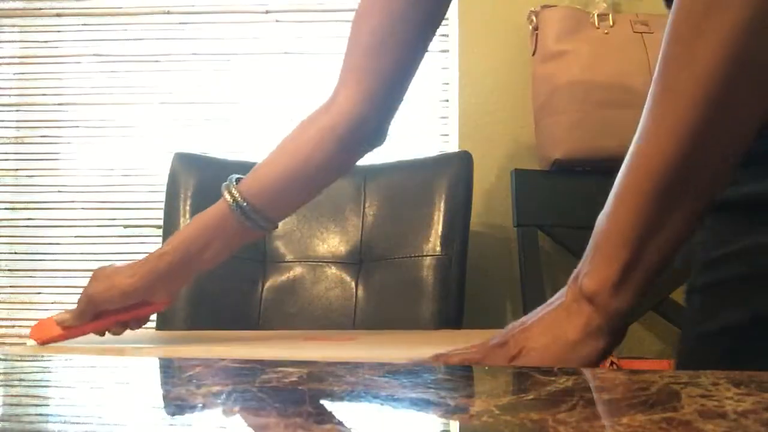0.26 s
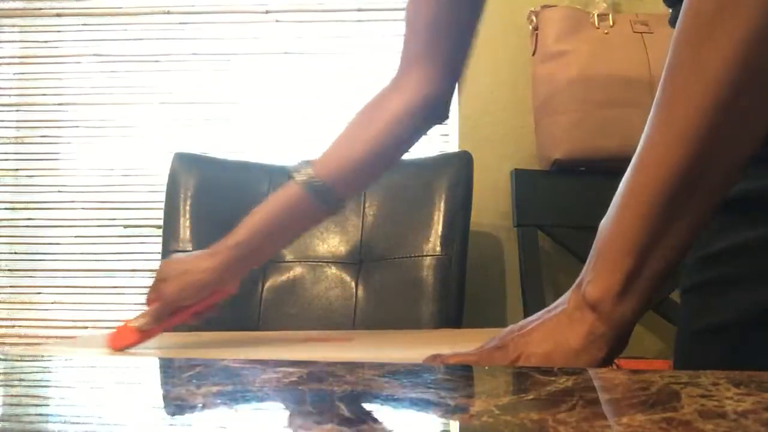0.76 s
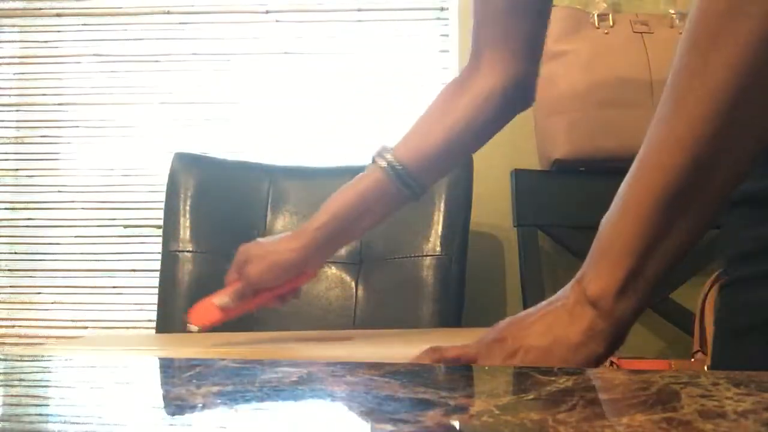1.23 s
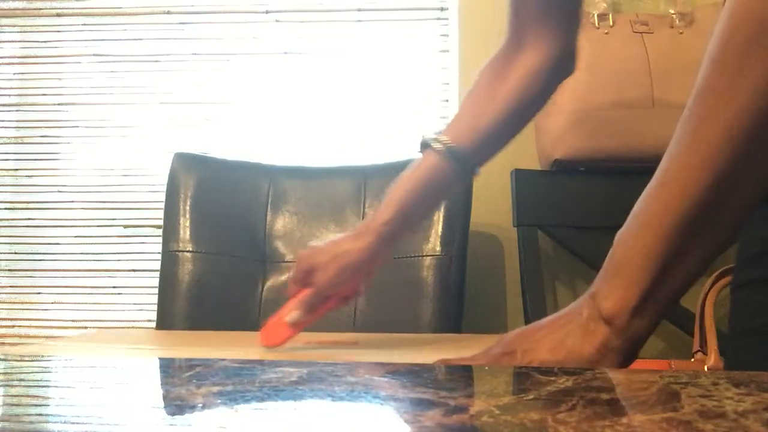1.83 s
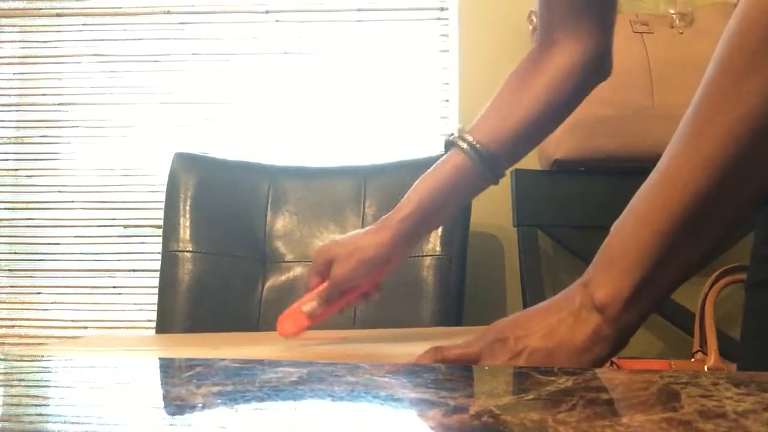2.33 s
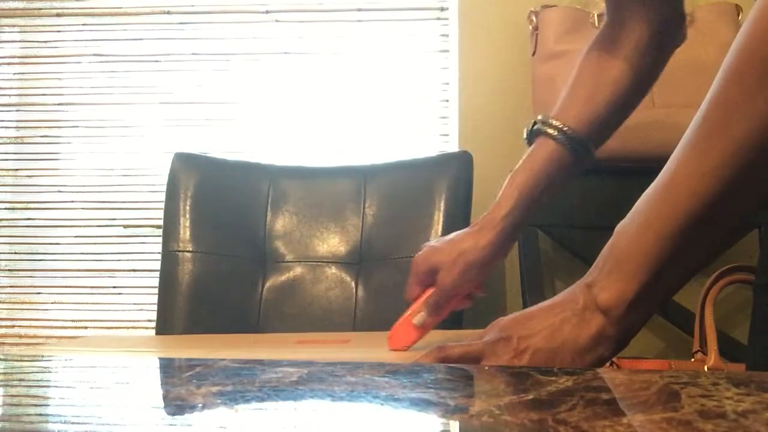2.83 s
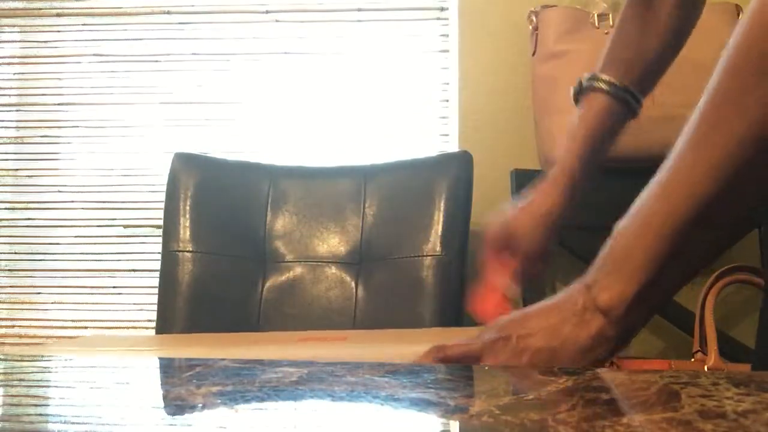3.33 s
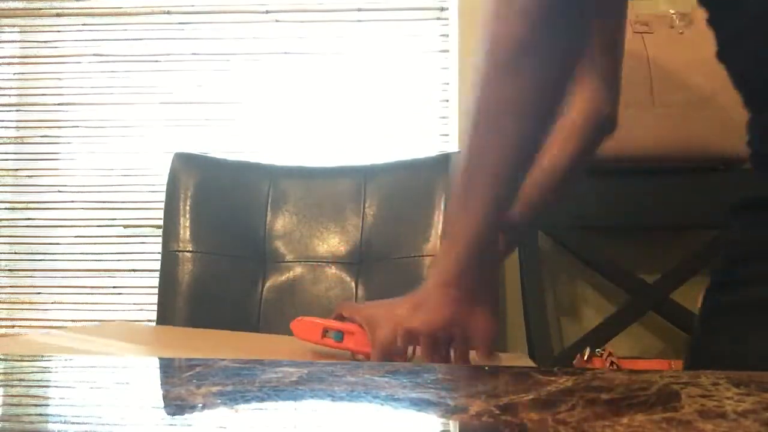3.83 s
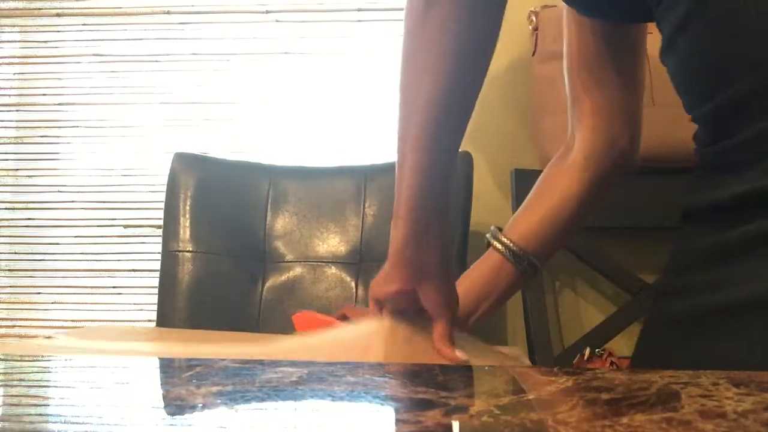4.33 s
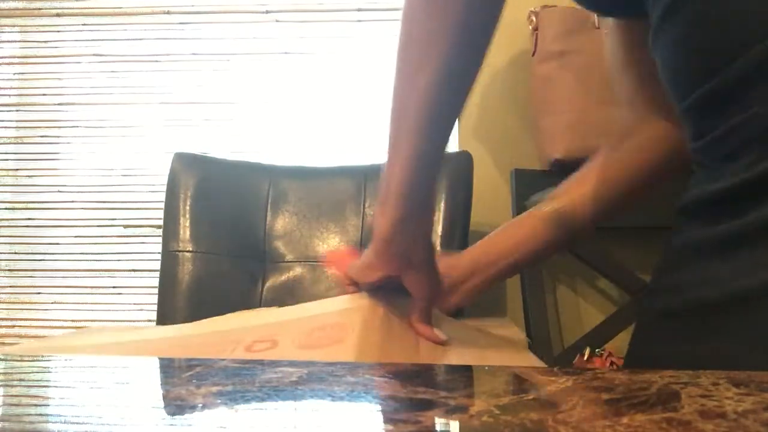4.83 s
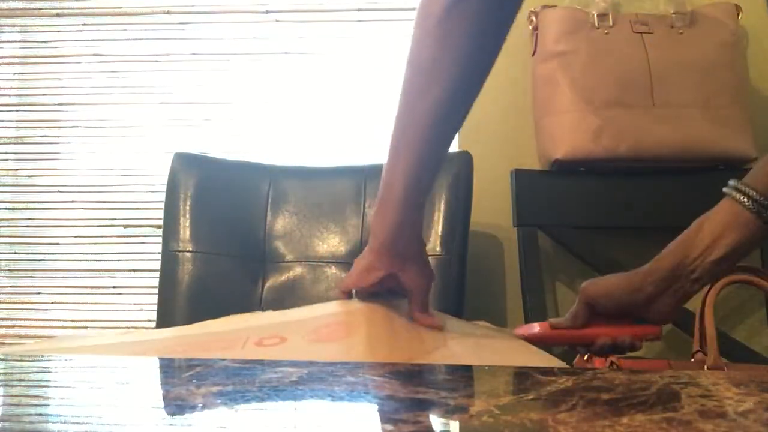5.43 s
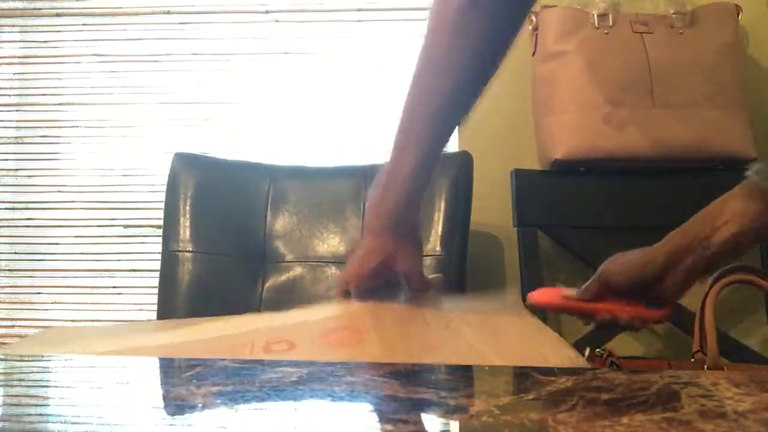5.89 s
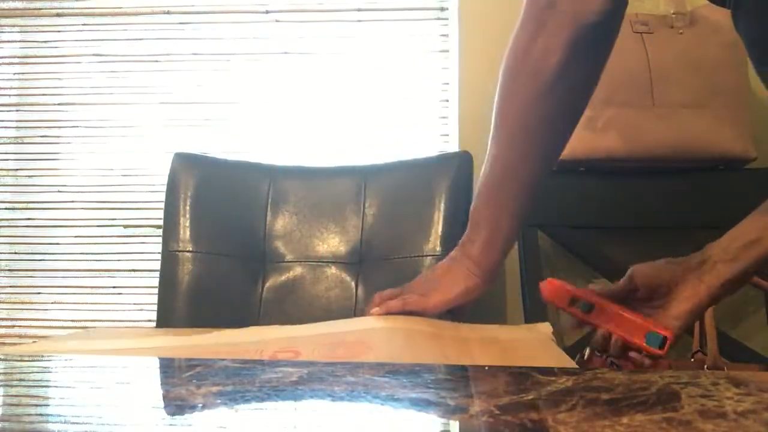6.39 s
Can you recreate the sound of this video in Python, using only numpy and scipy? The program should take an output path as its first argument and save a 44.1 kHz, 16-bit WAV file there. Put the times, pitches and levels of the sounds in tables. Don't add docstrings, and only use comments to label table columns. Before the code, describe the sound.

A close phone microphone, about arm's length away, in a small furnished room with faint air and low appliance hum. Light scuffs of blade and fingers come first. From 0.4 to 1.25 seconds a cutter drags through corrugated cardboard with a gritty, jerky rasp. Shorter pulls start at 1.45 with a sharp catch, 1.8 and 2.23; a hard catch at 2.48 begins another drag, and a last long scrape runs from 2.9 to 3.45, shaking the counter softly. At 3.49 the plastic slider clacks brightly. Palms brush the sheet at 3.7. Folding builds from 4.0, with snaps at 4.15 and 4.28, the loudest crack at 4.38, and more cracks and a low thud at 4.53 and 4.63. Rustling fades by 5; small ticks come near 5.3, a soft flopping thud at 5.6, a tick at 6.0, then rubbing and light slider rattles from 6.3 to 6.6.

```python
import sys
import numpy as np
from scipy import signal
from scipy.fft import rfft, irfft, next_fast_len
from scipy.io import wavfile
from scipy.ndimage import uniform_filter1d, map_coordinates

SR = 44100
rng = np.random.default_rng(int(sys.argv[2]) if len(sys.argv) > 2 else 0)


def level_to_linear(level):
    exponent = np.asarray(level, float) / 20
    return 10 ** exponent


def waveform_to_disk(signal):
    frames = np.transpose(np.atleast_2d(signal))
    scaled = np.clip(frames, -1, 1) * 32767
    samples = np.round(scaled).astype(np.int16)
    wavfile.write(sys.argv[1], SR, samples)


N = 293425


def unit(x):
    return x / np.sqrt(np.mean(x ** 2) + 1e-20)


def along(points, hz):
    f, v = np.transpose(points)
    return np.interp(np.log(hz + 1), np.log(f + 1), v)


def wobble(rate_hz):
    knots = rng.standard_normal(int(N * rate_hz / SR) + 4)
    return map_coordinates(knots, [np.arange(N) * rate_hz / SR])


def filtered(x, response):
    m = next_fast_len(len(x) + SR // 2)
    return irfft(rfft(x, m) * response(np.fft.rfftfreq(m, 1 / SR)), m)[:len(x)]


def resonances(modes):
    def response(f):
        total = 0
        for k, (hz, width, db) in enumerate(modes):
            total = total + (-1) ** k * level_to_linear(db) * 1j * f * width / (hz * hz - f * f + 1j * f * width)
        return total
    return response


def burst(noise, t60, rise, colour, spike=0):
    t = np.arange(len(noise)) / SR
    force = noise * level_to_linear(-60 * t / max(t60, .002)) * (1 - np.exp(-t / rise))
    first_break = spike * (np.arange(len(noise)) == 8)
    y = filtered(force + first_break, colour)
    return y / np.abs(y).max()


# (frequency [Hz], level [dB per Hz])
AIR_SPECTRUM = [(15, -16), (25, -15), (86, 2.5), (306, -4.5), (423, -24), (724, -15), (1080, -19),
                (1310, -16), (1670, -25), (2020, -23.5), (6770, -26.5), (14400, -31.5), (15600, -31)]


def air():
    tone = unit(filtered(rng.standard_normal(N), lambda f: level_to_linear(along(AIR_SPECTRUM, f))))
    hum = level_to_linear(-75.0 + 2.5 * wobble(3.1)) * np.sin(2 * np.pi * 59.9 * np.arange(N) / SR)
    return level_to_linear(-65 + 0.84 * wobble(3.54)) * tone + hum


# (frequency [Hz], t60 [s])
ROOM_DECAY = [(100, 0.3), (500, 0.27), (2000, 0.33), (6000, 0.4), (14000, 0.22)]


def room(x):
    out, hop = np.zeros(N + 2 * SR), SR // 3
    for at in range(0, N, hop):
        hz, t, z = signal.stft(rng.standard_normal(SR // 2), SR, nperseg=256)
        decay = level_to_linear(-60 * t / along(ROOM_DECAY, hz)[:, None])
        tail = signal.istft(z * decay, SR, nperseg=256)[1]
        wet = signal.fftconvolve(x[at:at + hop], tail / np.linalg.norm(tail))
        out[at + 300:][:len(wet)] += wet
    return out[:N]


def ringing(strikes, rise, blur):
    out, t = np.zeros(N + SR), np.arange(SR // 4) / SR
    for s, hz, db, t60 in strikes:
        steps = rng.standard_normal(len(t) // 50)
        drift = np.interp(t, t[:len(steps)] * 50, np.cumsum(steps))
        wander = blur * np.sqrt(hz / 1000) * drift
        swell = level_to_linear(db - 60 * t / max(t60, .005)) * (1 - np.exp(-t / rise))
        out[round(s * SR):][:len(t)] += swell * np.sin(2 * np.pi * hz * t + wander)
    return out[:N]


# (time [s], frequency [Hz], peak level [dB], t60 [s])
BOARD_PATCHES = [(2.481, 654, -20, 0.028), (3.902, 230, -40, 0.16), (4.126, 1195, -40, 0.17),
                 (4.151, 722, -23.5, 0.052), (4.152, 1140, -28, .06), (4.17, 110, -29, 0.071),
                 (4.283, 607, -25.5, 0.056), (4.284, 1310, -35, 0.09), (4.288, 371, -28, 0.11),
                 (4.378, 630, -13.5, .07), (4.3775, 2080, -18, 0.025), (4.379, 1300, -26, 0.076),
                 (4.378, 2540, -31, 0.037), (4.381, 240, -27, 0.17), (4.535, 617, -23, 0.04),
                 (4.534, 2090, -25, 0.027), (4.537, 268, -26, 0.048), (4.631, 280, -7.5, 0.031),
                 (4.63, 2550, -29.5, 0.043), (4.642, 350, -28.5, 0.3), (4.645, 994, -35, .14),
                 (5.03, 568, -43.5, 0.054), (5.265, 907, -35, .05), (5.266, 1300, -38.5, 0.061),
                 (5.315, 1340, -41.5, 0.12), (5.35, 810, -40, 0.077), (5.608, 327, -23.5, .1),
                 (5.627, 606, -25, 0.17), (5.635, 110, -28, .15), (5.652, 400, -24, 0.14),
                 (5.693, 239, -23, .08), (6.03, 515, -41.5, 0.045), (6.311, 626, -37.5, 0.18),
                 (6.313, 393, -38.5, 0.13), (6.312, 1600, -44, 0.1), (5.645, 1000, -38, .14),
                 (4.635, 175, -18, .08), (4.63, 900, -24, .04), (5.62, 820, -26, .06),
                 (5.626, 290, -21, .12), (4.184, 2100, -32, .05), (4.152, 2100, -32, .05),
                 (5.607, 2550, -34, .05), (5.62, 1250, -32, .04), (5.246, 3350, -36, .02),
                 (4.036, 500, -32, .04), (3.684, 450, -38, .05), (5.264, 2150, -38, .03)]


def patches():
    return ringing(BOARD_PATCHES, rise=0.001, blur=0.43)


# (time [s], peak level [dB], frequency [Hz])
SHARP_TICKS = [(2.9532, -33, 2500), (3.4858, -20, 1900), (4.3766, -6.5, 2150), (4.3776, -12, 6000),
               (4.3872, -17, 6000), (5.2455, -38, 7000), (5.2752, -27, 5700), (5.314, -27, 6300),
               (5.9885, -24, 1900), (5.9888, -30, 6300)]


def ticks():
    out, impulse = np.zeros(N + SR), np.arange(SR // 50) == 8
    for s, db, hz in SHARP_TICKS:
        edge = resonances([(hz, 0.36 * hz, 0)])
        tick = filtered(-1. * impulse, lambda f: edge(f) ** 2)
        out[round(s * SR):][:len(tick)] += level_to_linear(db) * tick / np.abs(tick).max()
    return out[:N]


# (frequency [Hz], width [Hz], level [dB])
PANEL_MODES = [(597, 180, 2), (830, 350, 1.5), (1030, 156, 3), (1313, 124, 2.5), (1610, 140, -9)]
# (frequency [Hz], width [Hz], level [dB])
SHEET_MODES = [(89.5, 34, -5), (137, 37, 1.5), (225, 34, 4), (298, 48, 2), (350, 41, 2.5), (414, 70, -2.5)]


def snaps(events, hz, rise, spike, broad):
    out = np.zeros(N + SR)
    crack_band = resonances([(hz, .7 * hz, 0)])
    sharp = lambda f: crack_band(f) ** 2 + broad * 1j * f / (2500 + 1j * f) / (1 + 1j * f / hz)
    panel = lambda f: resonances(PANEL_MODES)(f) / (1 + 1j * f / 900)
    sheet = lambda f: resonances(SHEET_MODES)(f) / (1 + 1j * f / 450) ** 2
    for s, crack_db, knock_db, thud_db, t60 in events:
        a, b, c = rng.standard_normal((3, SR // 4))
        hit = level_to_linear(crack_db) * burst(a, t60, rise, sharp, spike)
        hit += level_to_linear(knock_db - 2.0) * burst(b, t60 + 0.019, 3 * rise, panel, 3 + 2.2 * spike)
        hit += level_to_linear(thud_db - 1.5) * burst(c, 1.24 * t60 + 0.021, 4 * rise, sheet, 9 + 4 * spike)
        out[round(s * SR):][:len(hit)] += hit
    return out[:N]


# (time [s], crack [dB], knock [dB], thud [dB], burst t60 [s])
SCUFF_EVENTS = [(.0074, -41.5, -57, -72, 0.025), (.0217, -49.5, -62, -61, 0.094),
                (.0453, -42.5, -64, -70, .05), (.0538, -55, -74, -57, 0.021),
                (.2463, -35.5, -47, -45, 0.025), (.2963, -46, -54, -47, 0.048), (.33, -44, -66, -56, 0.037),
                (.3385, -39.5, -70, -47, 0.014), (2.5622, -36.5, -38, -43, 0.039),
                (4.1225, -39, -28, -40, 0.12), (5.5664, -44, -46, -50, 0.02)]


def scuffs():
    return snaps(SCUFF_EVENTS, 3150, rise=0.0012, spike=0.38, broad=0.099)


# (time [s], crack [dB], knock [dB], thud [dB], burst t60 [s])
BUCKLE_EVENTS = [(3.6851, -42.5, -41.5, -31, 0.091), (3.8977, -43, -34.5, -27.5, 0.028),
                 (4.151, -24.5, -21.5, -30, 0.061), (4.1834, -25, -38, -29, 0.023),
                 (4.597, -30, -41, -37, 0.016), (5.2644, -32.5, -40, -43, 0.023),
                 (5.3484, -45, -33, -33, 0.042), (5.606, -33.5, -37, -22.5, 0.046),
                 (5.6256, -34, -33, -25, 0.073), (6.0295, -45, -40, -33, 0.023),
                 (5.932, -51, -45, -53, 0.033), (6.152, -51, -42, -36.5, 0.11),
                 (6.3065, -51, -36, -50, 0.15)]


def buckles():
    return snaps(BUCKLE_EVENTS, 1640, rise=0.00079, spike=0.21, broad=0.62)


# (time [s], crack [dB], knock [dB], thud [dB], burst t60 [s])
SPLIT_EVENTS = [(4.35, -33, -73, -74, .04), (4.3765, -17, -73.5, -73, 0.011),
                (4.5678, -31, -75, -68, 0.013), (4.5947, -28, -64, -73, .03),
                (4.6292, -13, -70.5, -67.5, 0.009), (5.108, -41, -75, -75, 0.0091)]


def splits():
    return snaps(SPLIT_EVENTS, 10400, rise=0.00065, spike=3.5, broad=0.13)


# (time [s], crack [dB], knock [dB], thud [dB], burst t60 [s])
CREASE_EVENTS = [(1.816, -50, -49, -54, .027), (1.9166, -31, -30, -58, .0067),
                 (2.5003, -30.5, -42, -47, 0.044), (2.9534, -44, -32, -61, .026),
                 (3.717, -42.5, -45, -41, 0.048), (3.9065, -38, -33, -28.5, 0.057),
                 (4.0142, -45.5, -46, -54, 0.068), (4.0357, -35.5, -31, -27, 0.038),
                 (4.0534, -44, -55, -38, 0.019), (4.2812, -18.5, -19, -24, 0.092),
                 (4.377, -8, -13, -22.5, 0.03), (4.3864, -14, -24, -47, 0.02),
                 (4.5331, -15, -19.5, -18.5, 0.026), (4.6289, -13, -20, -14, 0.04),
                 (4.9314, -42, -46.5, -37.5, 0.039), (4.9945, -55, -70.5, -54, 0.019),
                 (5.0295, -46, -52.5, -38, 0.014), (5.108, -49, -53, -44.5, 0.1),
                 (5.3138, -31, -41, -44, 0.038)]


def creases():
    return snaps(CREASE_EVENTS, 2080, rise=0.00026, spike=1.2, broad=1.0)


# (time [s], crack [dB], knock [dB], thud [dB], burst t60 [s])
CATCH_EVENTS = [(.3957, -35.5, -68, -46.5, 0.038), (.4614, -51, -63, -56, 0.023),
                (1.4486, -21, -49, -48, 0.012), (2.2295, -29.5, -68, -58, 0.017),
                (2.3612, -32, -50, -42, 0.065), (2.4799, -23, -34, -49, 0.0099),
                (5.218, -57, -47.5, -46, .029), (5.246, -39, -46, -49, 0.024), (5.2748, -36, -39, -59, .02)]


def catches():
    return snaps(CATCH_EVENTS, 3450, rise=0.00029, spike=2.06, broad=0.42)


# (frequency [Hz], level [dB], t60 [s])
STEEL_MODES = [(2160, 1.5, 0.076), (3150, 0, 0.068), (4820, -1, 0.055), (6430, -0.5, .04), (7450, -3, 0.06),
               (9330, -7, 0.037), (10500, -8, .05), (11700, -16.5, 0.082), (14300, -9.5, .045)]
# (time [s], peak level [dB], favoured frequency [Hz])
BLADE_CHINKS = [(3.4865, -28, 7800), (6.3125, -53, 3150), (6.3635, -41, 4900), (6.3705, -46, 9500),
                (6.385, -51, 5500), (6.4705, -45, 8500), (6.471, -56, 2160), (6.545, -45.5, 2160),
                (6.5565, -45, 9340), (6.573, -51, 3150), (6.5875, -51, 3150)]


def steel():
    strikes = []
    for s, db, near_hz in BLADE_CHINKS:
        for hz, level, t60 in STEEL_MODES:
            loss_db = 22.5 * abs(np.log(hz / near_hz))
            strikes.append((s, hz, db + level - loss_db, t60))
    return ringing(strikes, rise=0.00035, blur=0.25)


# (time [s], peak level [dB], top over peak [dB], burst t60 [s], contact pitch
# [Hz])
SLIDER_CLICKS = [(3.4567, -41.5, -25, 0.028, 1910), (3.474, -42.5, -25, 0.034, 1980),
                 (3.486, -16, 12, 0.023, 2030), (3.8272, -47, -8, 0.012, 7630),
                 (5.9879, -33, -35, 0.005, 1980), (6.313, -69, -25, 0.013, 3230),
                 (6.3645, -42.5, -17, 0.012, 5700), (6.384, -47, -8, .01, 7500),
                 (6.4705, -35.5, 0, 0.012, 7450), (6.5327, -46, -19, 0.012, 2150),
                 (6.5433, -45, -19, 0.016, 2140), (6.573, -47, -16.5, 0.0073, 3250),
                 (6.6065, -47, -24, 0.0089, 4060),
                 (6.3685, -47, 6, 0.011, 9100), (6.5255, -50, -12, 0.014, 2300),
                  (6.5565, -48, -6, .012, 7600), (6.5725, -53, -8.5, .008, 6300),
                  (6.588, -43.5, -8, .01, 3250), (6.611, -50, -15, .008, 3250)]
# (frequency [Hz], width [Hz], level [dB])
HANDLE_MODES = [(2013, 170, -1), (3280, 140, -4.5), (3900, 440, -4), (4930, 480, -8.5), (7600, 160, -5),
                (9100, 410, -19), (12160, 840, 0)]
# (frequency [Hz], level [dB per Hz])
CLACK_SPECTRUM = [(700, -52), (1800, -15), (2060, 2), (2450, -11), (5600, -4), (7400, -4), (9000, -21),
                  (11700, -22), (19800, -120)]


def slider():
    out = np.zeros(N + SR)
    clack = lambda f: level_to_linear(along(CLACK_SPECTRUM, f))
    top = lambda f: (1j * f / (7000 + 1j * f)) ** 3
    for s, db, top_db, t60, pitch_hz in SLIDER_CLICKS:
        a, b, c = rng.standard_normal((3, SR // 4))
        modes = [(hz, width, level - 14 * abs(np.log(hz / pitch_hz))) for hz, width, level in HANDLE_MODES]
        clack_db = -7 * abs(np.log(pitch_hz / HANDLE_MODES[0][0]))
        ring_db = -9 - 0.16 * top_db
        click = level_to_linear(clack_db) * burst(a, t60, 0.00028, clack, spike=1.58)
        click += level_to_linear(top_db) * burst(b, 1.3 * t60, 0.0023, top, spike=5.5)
        click += level_to_linear(ring_db) * burst(c, 2.7 * t60, 0.001, resonances(modes), spike=3.0)
        out[round(s * SR):][:len(click)] += level_to_linear(db + 3) * click
    return out[:N]


# (middle time [s], frequency [Hz], level [dB], length [s])
NARROW_TONES = [(.022, 3000, -64, .04), (.057, 3000, -62, 0.016), (.058, 2360, -58, 0.017),
                (0.272, 2420, -59, .05), (.3, 4600, -58, 0.022), (.34, 3200, -60, 0.043),
                (.48, 4020, -64, .06), (0.573, 5030, -49, 0.076), (.57, 3900, -52, 0.066),
                (.62, 2086, -52, .12), (0.78, 3900, -53, 0.15), (0.811, 2830, -52, .18), (0.8, 1300, -54, 0.2),
                (0.717, 900, -54, 0.053), (1.054, 760, -57, 0.29), (1.57, 2120, -49, 0.11),
                (1.592, 1340, -56.5, 0.13), (1.61, 2850, -54, .1), (1.482, 680, -54, 0.069),
                (1.863, 1030, -50, .1), (2.023, 2730, -52.5, 0.073), (2.04, 1300, -51.5, 0.05),
                (1.96, 88, -40, 0.082), (3.379, 97.4, -47, 0.083), (.3, 335, -64, 0.56), (.35, 60, -61, 0.16),
                (2.68, 2950, -52.5, 0.22), (3.25, 326, -49.5, 0.19), (3.27, 806, -54, 0.17),
                (3.42, 192, -52, 0.095), (3.72, 71.4, -51.5, .12), (3.92, 60, -49.5, .12),
                (4.72, 967, -50, 0.1), (5.34, 2640, -60, 0.032), (5.52, 128, -53, 0.048),
                (5.52, 813, -56, 0.13), (3.545, 2030, -51, .11), (6.03, 2060, -60, .075),
                (6.025, 4100, -59, .06), (6.64, 381, -57, 0.032), (.065, 3220, -57, 0.012)]


def singing():
    out, t = np.zeros(N + 2 * SR), np.arange(-SR // 4, SR // 4) / SR
    for s, hz, db, length in NARROW_TONES:
        body = resonances([(hz, 0.073 * hz + 15, 0)])
        tone = unit(filtered(rng.standard_normal(len(t)), lambda f: body(f) ** 2))
        out[round(s * SR):][:len(t)] += level_to_linear(db) * np.exp(-(2 * t / length) ** 4) * tone
    return out[SR // 4:][:N]


def curves(tables, colours, hum_db, hum_share):
    t = np.arange(N) / SR
    levels_db, centre_hz = np.full((4, N), -120.), np.full(N, 3000.)
    for rows, (start_hz, end_hz, hiss_db) in zip(tables, colours):
        s, level, weight = np.transpose(rows)
        inside = (t >= s[0]) & (t <= s[-1])
        force = np.interp(t[inside], s, level)
        load = np.interp(t[inside], s, weight)
        hiss = force + hiss_db + 0.41 * np.minimum(force + 46, 0)
        hum = force + hum_db + hum_share * load
        glide = np.interp(t[inside], s[[0, -1]], [start_hz, end_hz])
        centre_hz[inside] = np.where(force > levels_db[0, inside], glide, centre_hz[inside])
        levels_db[:, inside] = np.maximum(levels_db[:, inside], [force, hiss, hum, force + load])
    return *uniform_filter1d(level_to_linear(levels_db), size=200, axis=1), centre_hz


def fibres(spread_db, clump_db, clump_rate):
    uneven_db = spread_db * np.minimum(rng.exponential(size=N), 5)
    clumps_db = clump_db * np.clip(wobble(clump_rate), -2, 2)
    return unit(level_to_linear(uneven_db + clumps_db) * rng.standard_normal(N))


def shifting(x, centre_hz, lift_db, width, patchy_db):
    hz, t, z = signal.stft(x, SR, nperseg=512)
    field = uniform_filter1d(rng.standard_normal(z.shape), size=3, axis=0)
    field = unit(uniform_filter1d(field, size=14, axis=1))
    centre = np.interp(t * SR, np.arange(N), centre_hz)
    band = np.exp(-(np.log((hz[:, None] + 1) / centre) / width) ** 2)
    return signal.istft(z * level_to_linear(lift_db * band + patchy_db * field), SR, nperseg=512)[1][:N]


# (frequency [Hz], level [dB per Hz])
RASP_SPECTRUM = [(760, -82), (1300, -0.5), (1830, -2), (2110, -2.5), (2500, -2), (2830, 1.5), (9000, -16),
                 (11700, -2.5), (19800, -120)]
# (frequency [Hz], level [dB per Hz])
HISS_SPECTRUM = [(4120, -54.5), (7000, 5), (7770, 1.5), (10400, -0.5), (11900, -3), (13200, 4), (14700, 3),
                 (15600, -0.5)]
# (frequency [Hz], width [Hz], level [dB])
BLADE_MODES = [(2055, 310, 1), (2850, 89, -11.5), (3550, 550, -14), (4390, 530, 3.5), (6020, 1300, 9),
               (7840, 350, 8.5)]
# (frequency [Hz], width [Hz], level [dB])
BOARD_MODES = [(635, 164, 2.5), (859, 197, 0.5), (1002, 140, 2), (1296, 83, 4.5), (1514, 420, -6.5)]


def friction(levels, base, jerk_db, lift_db):
    rasp, hiss, hum, rumble, centre_hz = levels
    jerk = level_to_linear(jerk_db * wobble(45))
    tear = fibres(spread_db=2.5, clump_db=1.6, clump_rate=280)
    tear = shifting(tear, centre_hz, lift_db, width=0.51, patchy_db=1.8)

    def blade(f):
        power = sum(np.abs(resonances([mode])(f)) ** 2 for mode in BLADE_MODES)
        return level_to_linear(along(RASP_SPECTRUM, f)) * np.sqrt(0.25 + power)

    def panels(f):
        return resonances(BOARD_MODES)(f) / (1 + (f / 1700) ** 4) / (1 + (420 / (f + 1)) ** 4)

    sound = rasp * unit(filtered(tear, blade))
    sound += hiss * unit(filtered(tear, lambda f: level_to_linear(along(HISS_SPECTRUM, f))))
    sound += hum * unit(filtered(jerk * tear, panels))
    shove = level_to_linear(0.49 * wobble(24)) * fibres(spread_db=2.5, clump_db=2.5, clump_rate=76)
    sound += rumble * unit(filtered(shove, lambda f: resonances(base)(f) / (1 + (f / 680) ** 4)))
    return jerk * sound


# (peak time [s], rustle [dB], weight [dB], rise [s], fall [s])
PALM_RUBS = [(.31, -60, -18, 0.35, 0.22), (3.683, -54.5, 6.5, 0.0069, 0.34), (5.0, -64.5, -10, .012, 0.2),
             (5.2, -79.5, 15, 0.24, .1), (5.33, -53, 5.5, .2, 0.094), (5.936, -64, 6.5, 0.26, 0.12),
             (5.98, -61, 3, 0.034, 0.049), (6.07, -74, 17, .3, 0.27), (6.164, -62, 12, 0.085, 0.11),
             (6.284, -78, 23.5, 0.48, 0.056), (6.329, -63, 15, 0.19, 0.26), (6.37, -58.5, 11, 0.034, 0.1),
             (6.545, -53, -41, 0.028, 0.12), (6.629, -72.5, 20.5, 0.052, 0.058)]


def brushes():
    return [[(s - abs(rise), db - 36, load), (s, db, load), (s + abs(fall), db - 36, load)]
            for s, db, load, rise, fall in PALM_RUBS]


# (time [s], rustle [dB], weight [dB])
FOLD_GESTURES = [
    [(3.85, -79, 20), (4.0, -74, 19), (4.1, -58, 11), (4.292, -49.5, 6.5), (4.372, -40, 5.5),
     (4.496, -47.5, 6.5), (4.8, -55.5, 2.5), (4.878, -61.5, 9.5), (5.0, -97, 13)],
    [(5.44, -92, 27), (5.468, -59, 7), (5.588, -57, 6.5), (5.602, -46, -4), (5.624, -37, 7),
     (5.688, -50, 20), (5.744, -63.5, 14), (5.828, -67, 15), (5.86, -76, 18.5)],
    [(4.11, -58, 0), (4.148, -47, 0), (4.156, -41.5, -6), (4.19, -47.5, -4), (4.25, -65, 0)],
]
# (band at start [Hz], band at end [Hz], hiss over rustle [dB])
GESTURE_COLOURS = [(3000, 2200, -5.5), (3050, 3700, -7), (3580, 2700, 0)]
# (frequency [Hz], width [Hz], level [dB])
LIFTED_SHEET_MODES = [(58.7, 15, 2), (88, 43, 2.5), (149, 31, 1), (223.4, 36, 1.5), (303, 68, -2),
                      (387.6, 37, 2), (678, 170, -5)]


def hands():
    colours = GESTURE_COLOURS + [(1930, 2460, -5)] * len(PALM_RUBS)
    levels = curves(FOLD_GESTURES + brushes(), colours, hum_db=-3, hum_share=0.51)
    return friction(levels, LIFTED_SHEET_MODES, jerk_db=2.0, lift_db=7.5)


# (time [s], tearing [dB], downward weight [dB])
FIRST_PULLS = [
    [(.43, -67, 0), (.514, -51.5, -10), (.576, -40, -8.5), (.644, -48.5, -2.5), (.768, -43, -4.5),
     (.95, -47, -1), (1.166, -46.5, -1.5), (1.22, -57, 5), (1.3, -89, 30)],
    [(1.452, -38, -1), (1.488, -43, -1), (1.526, -44.5, -6), (1.57, -42.5, -2), (1.692, -50, 0.5),
     (1.775, -68, -10)],
    [(1.79, -67, -8), (1.816, -45, 1.5), (1.936, -42.5, 5), (2.018, -50, 0), (2.03, -48.5, 5.5),
     (2.108, -68.5, 7), (2.2, -85, 0)],
]
# (time [s], tearing [dB], downward weight [dB])
LAST_PULLS = [
    [(2.232, -47.5, 4), (2.26, -51, -3), (2.32, -46, -2), (2.37, -54, 4), (2.454, -86.5, 34),
     (2.47, -53, 3)],
    [(2.484, -36.5, 14), (2.495, -58, 19.5), (2.548, -51.5, -5), (2.618, -41, 11), (2.658, -46, -2),
     (2.84, -49.5, -4), (2.914, -52.5, 13)],
    [(2.914, -53, 7.5), (3.086, -49, -3), (3.17, -43, 4), (3.28, -41.5, 2), (3.334, -46, 2),
     (3.396, -54, 9), (3.45, -67, 4)],
]
# (strongest band at start [Hz], at end [Hz], hiss over tearing [dB])
PULL_COLOURS = [(3800, 2570, -3), (3260, 3260, -4), (3130, 2550, 1), (3150, 2700, -6.5), (3000, 2570, -2),
                (2950, 2580, -4)]
# (frequency [Hz], width [Hz], level [dB])
COUNTER_MODES = [(57, 8.2, 3), (94, 33, 1.5), (139.5, 13.2, 5.5), (214.3, 28.6, 1), (345, 50, 5),
                 (391, 185, -3)]


def cutting():
    levels = curves(FIRST_PULLS + LAST_PULLS, PULL_COLOURS, hum_db=-1.5, hum_share=0.44)
    return level_to_linear(-3.0) * friction(levels, COUNTER_MODES, jerk_db=1.32, lift_db=8.5)


def scene():
    rub = cutting() + hands() + singing()
    hits = catches() + creases() + scuffs() + buckles() + splits() + patches() + ticks()
    click = slider()
    chinks = steel()
    sent = level_to_linear(-14.5) * chinks + level_to_linear(-9.5) * rub + level_to_linear(-7.5) * hits + level_to_linear(-5.5) * click
    return (rub + hits + click + chinks + room(sent) + air())[None]


def top_cut(x):
    return signal.sosfilt(signal.butter(12, 16410, fs=SR, output="sos"), x)


# (frequency [Hz], level [dB])
MICROPHONE_RESPONSE = [(20, -15), (55, 0.5), (9500, 1), (10450, -5), (11300, -1.5), (15250, -2),
                       (15500, -17), (16500, -37.5)]


def record(dry):
    mix = filtered(dry[0], lambda f: level_to_linear(along(MICROPHONE_RESPONSE, f)))[None]
    return top_cut(mix)


dry = scene()
out = record(dry)
waveform_to_disk(out)
```